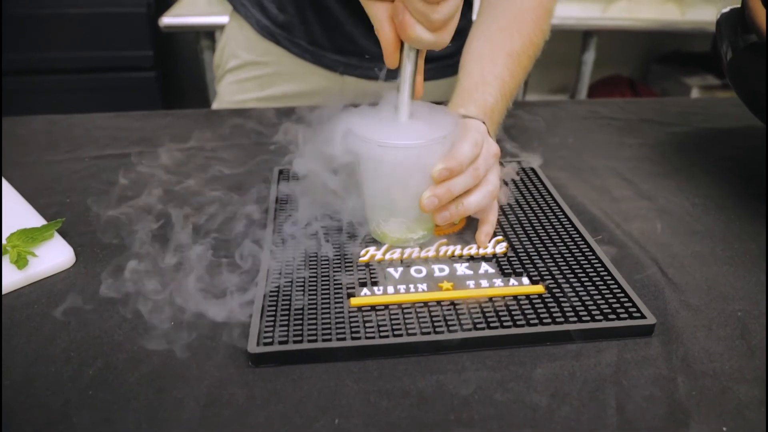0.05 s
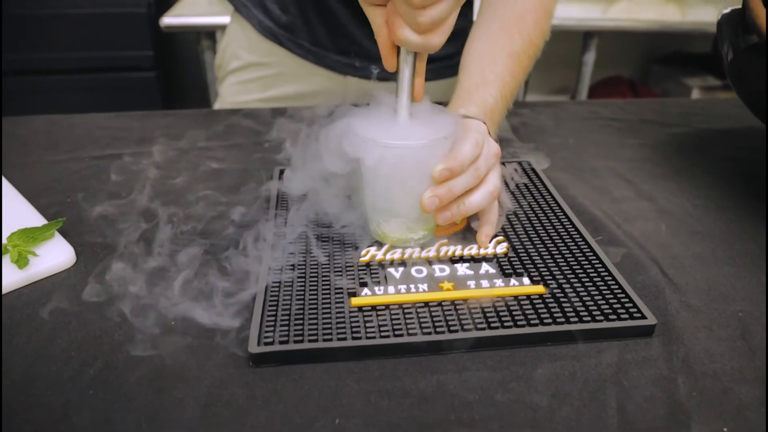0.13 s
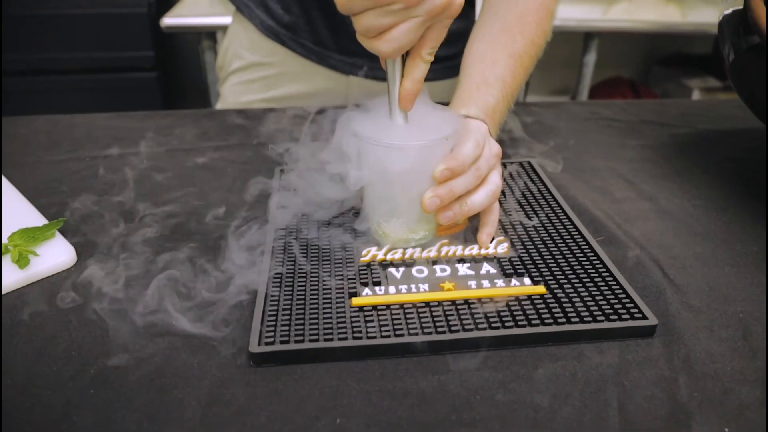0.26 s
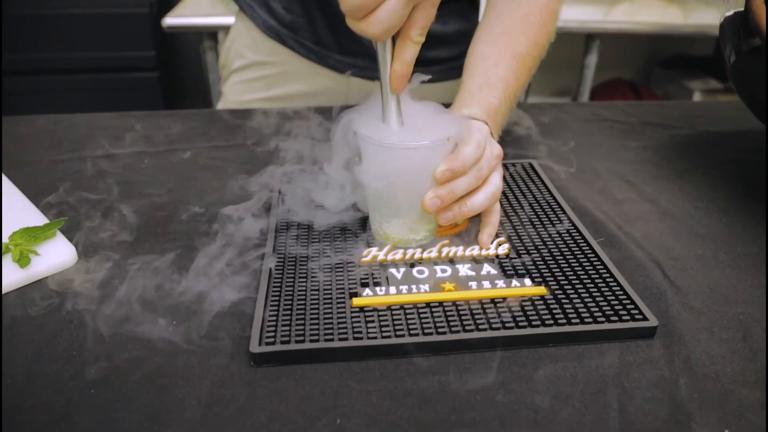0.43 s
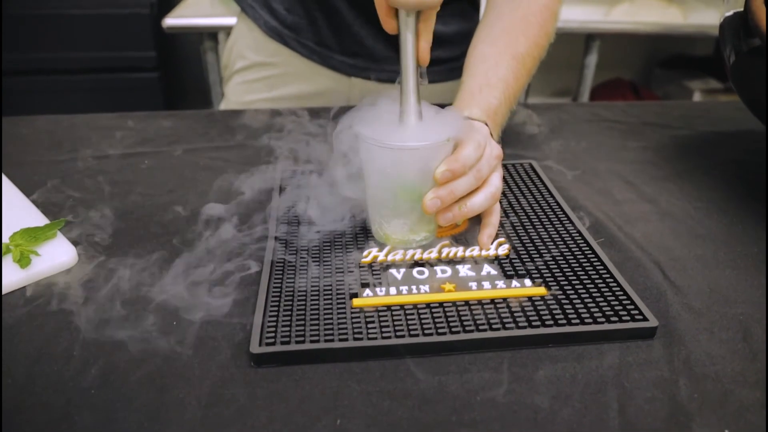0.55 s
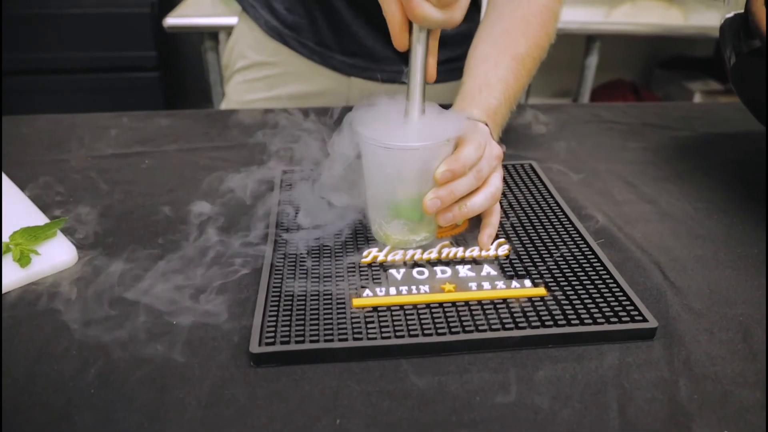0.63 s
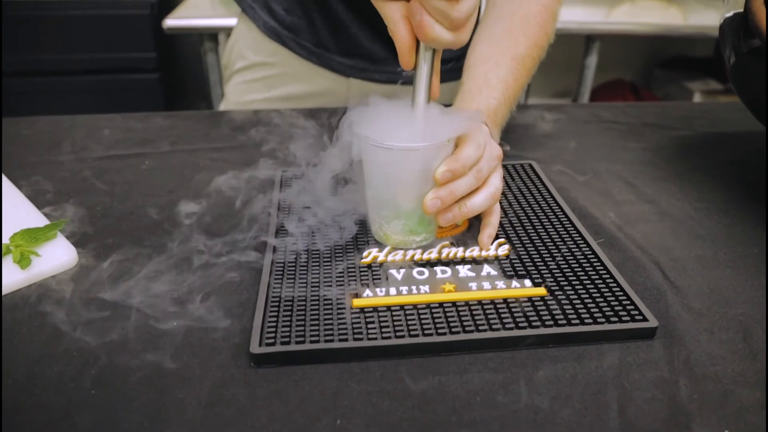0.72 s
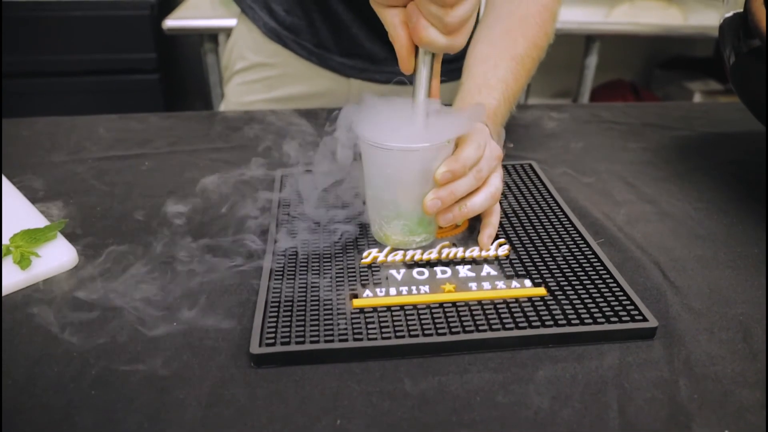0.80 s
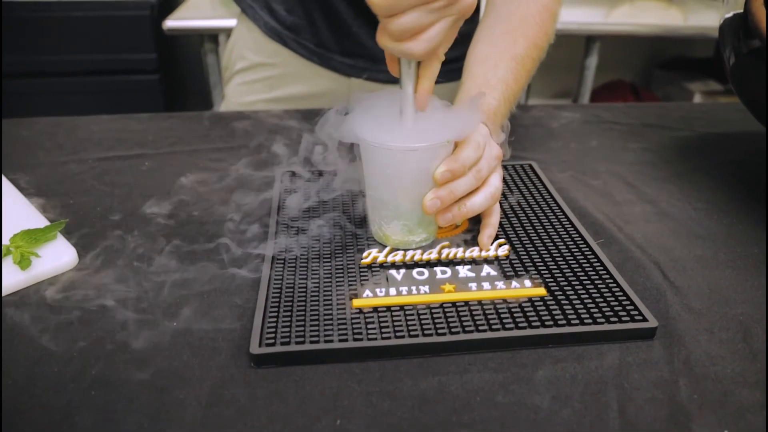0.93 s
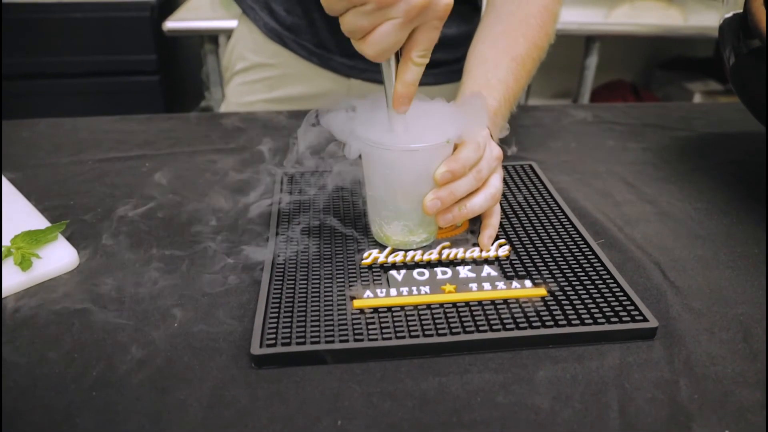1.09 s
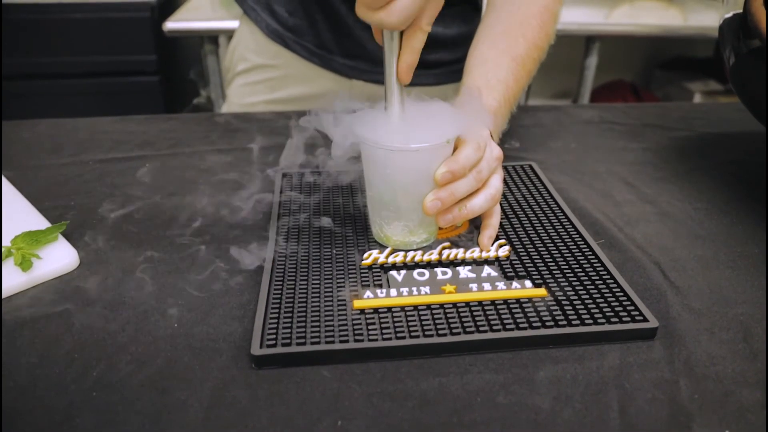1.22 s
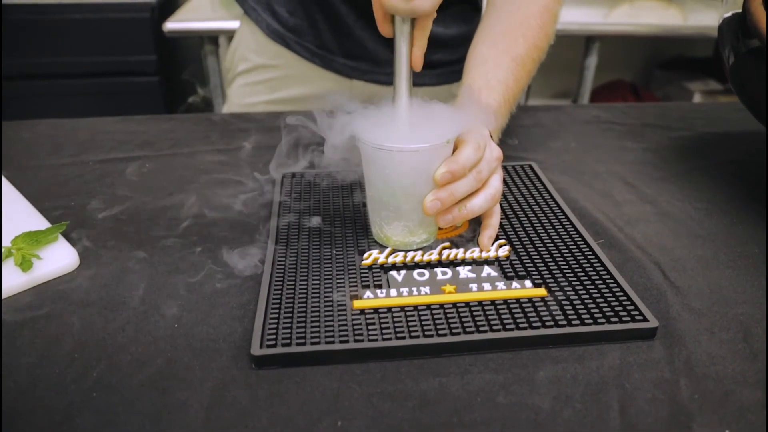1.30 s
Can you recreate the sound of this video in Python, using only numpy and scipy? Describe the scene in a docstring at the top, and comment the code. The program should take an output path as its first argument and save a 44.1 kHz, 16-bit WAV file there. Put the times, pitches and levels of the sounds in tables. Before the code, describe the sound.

A muddler crunches ice and leaves twice in a plastic cup, with faint fizzing.

```python
"""A bar counter in a small hard room, heard close up in mono. A muddler is pushed twice into a plastic
cup of ice and leaves that stands on a rubber mat. Crumbs grind under the stick, pieces crack and set
the cup ringing, the stick knocks in its hollow and each shove thuds through the counter.
Dry ice fizzes faintly in the cup. The room rings on, over ventilation rumble and a mains hum."""
import sys
import numpy as np
from scipy import signal
from scipy.fft import rfft, irfft
from scipy.io import wavfile

SR = 44100
rng = np.random.default_rng(int(sys.argv[2]) if len(sys.argv) > 2 else 0)


def waveform_to_disk(signal):
    """Save audio, clipped to [-1, 1], as 16-bit WAV at the path in sys.argv[1]."""
    frames = np.transpose(np.atleast_2d(signal))
    scaled = np.clip(frames, -1, 1) * 32767
    samples = np.round(scaled).astype(np.int16)
    wavfile.write(sys.argv[1], SR, samples)


N = 59535
TIME = np.arange(N) / SR
FREQ = np.maximum(np.fft.rfftfreq(2 * N, 1 / SR), 1)

# Pieces cracking. Each row: start in seconds, level in dB, extra body in dB, extra treble in dB,
# pitch of the piece in Hz.
CRACKS = [(.1044, -17, 6, -3, 3830), (0.113, -23.5, 5.5, -3, 3500), (0.1381, -23, 16.5, -4, 2210),
          (0.145, -25.5, 8, -2, 3220), (0.1554, -19.5, 5, -8, 3450), (.221, -16, 0, -25, 3030),
          (0.2441, -11, -14, -6, 3730), (.2454, 1.5, 8.5, -10, 3970), (0.2626, -25.5, 0, -3, 4130),
          (0.281, -24.5, 5, -10, 3600), (0.287, -20.5, 7, -3, 3150), (.3146, -9.5, 1, -5, 3300),
          (.33, 2, -2, 0, 4060), (0.3338, -13.5, 4, 7, 3130), (0.3369, -14, 6, -2, 4120),
          (.3598, -6, 1, -7, 4220), (.3608, -15.5, 2, -5, 2680), (.3638, -18.5, 8, 6, 4400),
          (.8605, -21.5, 3, -3, 3980), (.8657, -22.5, -5, -5, 3850), (.8742, -23, 8, 2, 3500),
          (.8805, -24.5, 5, 3, 3250), (.9168, -16, 4, -1, 3820), (.9887, -20, 5, -7, 2000),
          (.9952, -17.5, 3, -3, 3740), (.9957, -21.5, 6, -6, 2180), (1.0052, -24.5, 5, 2, 3530),
          (1.0564, -26.5, -7, -1, 3180), (1.0853, -27.5, 8, -8, 3670)]


def from_db(db):
    """Decibels to gain."""
    return 10 ** (np.asarray(db) / 20)


def unit_power(x):
    """Scale to a mean square of one."""
    return x / np.sqrt(np.mean(x ** 2) + 1e-20)


def level(rows):
    """Gain over time from rows of seconds and dB."""
    return from_db(np.interp(TIME, *np.transpose(rows)))


def at_hz(rows, hz, column=1):
    """Read a column of a table on a log-frequency axis."""
    rows = np.array(rows)
    return np.interp(np.log(hz), np.log(rows[:, 0]), rows[:, column])


def colour(x, db):
    """Causal filter with the given gain at every frequency."""
    n = len(x)
    cepstrum = irfft(np.log(from_db(db)))
    cepstrum[1:n] *= 2  # folded for minimum phase
    cepstrum[n + 1:] = 0
    return irfft(rfft(x, 2 * n) * np.exp(rfft(cepstrum)))[:n]


def band(spectrum, low_hz, high_hz):
    """The sound of one band of a spectrum."""
    return irfft(spectrum * ((FREQ >= low_hz) & (FREQ < high_hz)))[:N]


def clicks(starts_s, db):
    """One click at each time."""
    track = np.zeros(N)
    samples = np.clip(np.round(starts_s * SR).astype(int), 0, N - 1)
    np.add.at(track, samples, from_db(db))
    return track


def ring(x, hz, t60, hard=False):
    """One damped mode driven by x; a hard contact starts the wave at its crest."""
    radius = np.exp(-np.log(1000) / (t60 * SR))
    angle = 2 * np.pi * hz / SR
    zeros = [.5, 0, -.5] if hard else [0, np.sin(angle)]
    return signal.lfilter(zeros, [1, -2 * radius * np.cos(angle), radius ** 2], x + 1e-18)


def burst_envelope(hits, t60):
    """Short swells that start at each hit and die away."""
    decay = np.exp(-2 * np.log(1000) / (t60 * SR))
    return np.sqrt(signal.lfilter([1], [1, -decay], hits ** 2 + 1e-18))


def grains(spectrum, per_s, spread_db, t60):
    """Random tiny noise bursts of uneven size and a common colour, at unit power."""
    sizes = from_db(spread_db * np.minimum(rng.exponential(1, N), 4))
    hits = sizes * (rng.random(N) < per_s / SR)
    bursts = burst_envelope(hits, t60) * rng.standard_normal(N)
    return unit_power(colour(bursts, at_hz(spectrum, FREQ)))


def room_tone(air_db=-58, hum_hz=121.4, hum_db=-66.5):
    """Ventilation rumble and a mains hum lie steadily behind the cup."""
    # Moving air. Each row: frequency in Hz, relative noise density in dB.
    air_spectrum = [(60, -10), (125, 0.5), (200, -8.5), (320, -17), (1200, -23), (16000, -23.5)]
    air = unit_power(colour(rng.standard_normal(N), at_hz(air_spectrum, FREQ)))
    hum = np.sqrt(2) * np.sin(2 * np.pi * hum_hz * TIME)
    return from_db(air_db) * air + from_db(hum_db) * hum


def fizz():
    """Dry ice fizzes in the cup: dense, tiny bursts that swell with the second push."""
    # Strength of the fizz. Each row: time in seconds, level in dB.
    loudness = [(0, -57.5), (.5, -57), (.68, -57), (.87, -52), (.905, -46.5), (.935, -52), (1.06, -50.5),
                (1.35, -65)]
    # Its colour. Each row: frequency in Hz, relative level in dB.
    spectrum = [(500, -15), (780, -7.5), (1200, -16), (1800, -0.5), (3150, 0), (3800, 8), (4200, -6),
                (4900, -13), (6200, -6.5), (8500, -6), (10500, -13), (13000, -9.5), (16000, -12)]
    return level(loudness) * grains(spectrum, per_s=5000, spread_db=.5, t60=.0017)


def grinding():
    """Crumbs grind under the stick, grain by grain, during both pushes."""
    # Strength of the grinding. Each row: time in seconds, level in dB.
    loudness = [(0, -75), (.095, -54.5), (.13, -49), (.17, -51), (.205, -56), (.238, -49.5), (.262, -40),
                (.29, -38), (.35, -44), (.45, -58.5), (.79, -77), (.82, -48.5), (.845, -59), (.895, -49),
                (.945, -63.5), (1.02, -49), (1.1, -62), (1.35, -71)]
    # Its colour. Each row: frequency in Hz, relative level in dB.
    spectrum = [(80, -15), (200, 6.5), (350, -3), (530, -9.5), (780, 4.5), (1200, -12.5), (2000, -1),
                (2600, -4.5), (3300, -1), (4050, -4.5), (6500, -9), (16000, -29)]
    return level(loudness) * grains(spectrum, per_s=1100, spread_db=2, t60=.0076)


def crack_db(hz):
    """Strength of every crack at a frequency: blunt ones have body, brittle ones treble."""
    _, db, body_db, treble_db, _ = np.transpose(CRACKS)
    body_share = at_hz([(1280, 1), (2460, 0)], hz)
    treble_share = at_hz([(7460, 0), (12300, 1)], hz)
    return db + body_db * body_share + treble_db * treble_share


def cracks(contact_samples=256, piece_db=-15.5):
    """Each crack is a short force pulse: the piece clinks at its own pitch and the cup rings with it."""
    # Modes of the filled cup. Each row: frequency in Hz, gain in dB, time to fall 60 dB in seconds.
    cup_modes = [(412, -44, 0.068), (1393, -33, 0.0071), (1860, -31.5, 0.025), (742, -51.5, .29),
                 (3110, -20, .016), (3460, -23.5, .008), (4010, -23.5, .015), (4380, -21, .008),
                 (5960, -16.5, 0.0026), (7500, -22.5, 0.0045), (8160, -25.5, 0.0022), (11300, -14, 0.0011)]
    pulse_hz = np.maximum(np.fft.rfftfreq(2 * contact_samples, 1 / SR), 1)
    pulse_spectra = crack_db(pulse_hz[:, None]).T
    force, pieces = np.zeros(N), np.zeros(N)
    for (start_s, *_, piece_hz), pulse_db in zip(CRACKS, pulse_spectra):
        start = round(start_s * SR)
        pulse = np.zeros(N)
        pulse[start:start + contact_samples] = colour(signal.unit_impulse(contact_samples), pulse_db)
        force += pulse
        pieces += ring(pulse, piece_hz, t60=.0105, hard=True)
    cup = sum(from_db(db) * ring(force, hz, t60, hard=True) for hz, db, t60 in cup_modes)
    return cup_wall(from_db(piece_db) * pieces + cup)


def cup_wall(x, hz=5000, width_hz=3000):
    """The cup's wall spreads a sharp edge over its first few cycles (an allpass)."""
    radius = np.exp(-np.pi * width_hz / SR)
    poles = [1, -2 * radius * np.cos(2 * np.pi * hz / SR), radius ** 2]
    return signal.lfilter(poles[::-1], poles, x)


def splinters(gain_db=-17.5):
    """A burst of fine breakage dies away within milliseconds of each crack."""
    # Colour of the breakage. Each row: frequency in Hz, relative noise density in dB.
    spectrum = [(100, -10), (550, -13), (1400, -13), (2200, -7.5), (3800, 3), (5200, -8.5), (7000, -2),
                (9500, -12), (12500, -14), (16000, -39)]
    noise = unit_power(colour(rng.standard_normal(N), at_hz(spectrum, FREQ)))
    noise_spectrum = rfft(noise, 2 * N)
    starts_s = np.array(CRACKS)[:, 0]
    edges_hz = [60, 1600, 2600, 5000, 7000, 10000, 18000]
    breakage = np.zeros(N)
    for low, high in zip(edges_hz, edges_hz[1:]):
        hits = clicks(starts_s, crack_db(np.sqrt(low * high)))
        breakage += burst_envelope(hits, t60=.016) * band(noise_spectrum, low, high)
    return from_db(gain_db) * breakage


def thuds():
    """The cup's base pushes through the mat into the counter; slow shoves favour its lowest mode."""
    # Shoves. Each row: start in seconds, level in dB, extra level for the lowest mode in dB.
    shoves = [(.111, -44.5, 7), (0.131, -42.5, -3), (0.145, -35.5, -6), (.162, -41, 3), (0.221, -37.5, -16),
              (.2455, -35.5, -12), (0.316, -43.5, -15), (0.812, -44.5, -2), (0.99, -35.5, -20),
              (0.9954, -40, -14), (1.15, -52, 5.5)]
    # Modes of the counter. Each row: frequency in Hz, gain in dB, time to fall 60 dB in seconds.
    counter_modes = [(73.6, 0.5, 0.044), (108, -1, 0.1), (138, 2, 0.044), (206, 1, 0.029), (324, -9, 0.086)]
    starts_s, shove_db, depth_db = np.transpose(shoves)
    counter = np.zeros(N)
    for k, (hz, mode_db, t60) in enumerate(counter_modes):
        force = clicks(starts_s, shove_db + mode_db + depth_db * (k == 0))
        counter += (-1) ** k * ring(force, hz, t60)  # modes alternate in polarity
    return counter


def knocks():
    """Blunt bumps of the stick sound the hollow of the cup."""
    # Bumps. Each row: start in seconds, level in dB, pitch in Hz.
    bumps = [(.1465, -33.5, 760), (0.2204, -33.5, 810), (0.2456, -23, 730), (.315, -38, 750),
             (0.823, -45, 887), (.875, -38.5, 875), (.9897, -37, 843)]
    return sum(ring(clicks(np.array([start_s]), db), hz, t60=.024) for start_s, db, hz in bumps)


def room_tail(x, build_s=.0059):
    """The hard room returns a diffuse tail that builds up quickly and dies band by band."""
    # Reverberation. Each row: frequency in Hz, level in dB, time to fall 60 dB in seconds.
    reverb = [(70, -5, 0.16), (170, -6.5, 0.2), (750, -12, 0.84), (1300, -7.5, 0.44), (3080, -19.5, 0.89),
              (3900, -12.5, 0.69), (5660, -12.5, 0.57), (7300, -18.5, 0.52), (15100, -20.5, 0.29)]
    noise_spectrum = rfft(rng.standard_normal(2 * N))
    build_up = 1 - np.exp(-(TIME / build_s) ** 2)
    edges_hz = np.geomspace(60, 18000, 29)
    tail = np.zeros(N)
    for low, high in zip(edges_hz, edges_hz[1:]):
        hz = np.sqrt(low * high)
        t60 = at_hz(reverb, hz, column=2)
        fade = build_up * np.exp(-np.log(1000) * TIME / t60)
        fade /= np.sqrt(np.sum(fade ** 2))  # unit energy
        tail += from_db(at_hz(reverb, hz)) * fade * band(noise_spectrum, low, high)
    return signal.fftconvolve(x, tail)[:N]


def scene():
    """The cup close up, alike in both channels; only the muddling sets the room ringing."""
    crumbs = grinding()
    dry_ice = fizz()
    muddling = crumbs + cracks() + splinters() + thuds() + knocks()
    mono = muddling + room_tail(muddling) + dry_ice + room_tone()
    return np.array([mono, mono])


def record(dry):
    """The top of the treble is cut steeply."""
    cutoff_hz = 15800
    lowpass = signal.ellip(10, .1, 70, cutoff_hz, fs=SR, output="sos")
    return signal.sosfilt(lowpass, dry)


dry = scene()
out = record(dry)
waveform_to_disk(out)
```